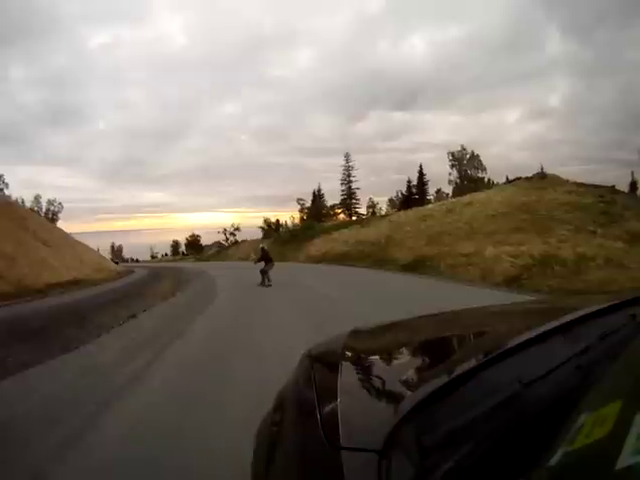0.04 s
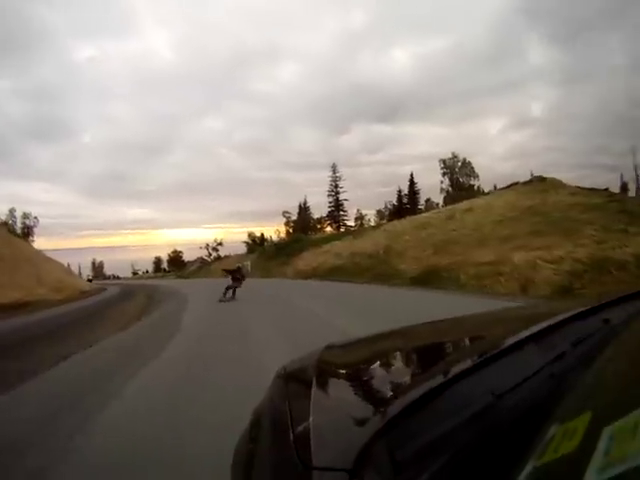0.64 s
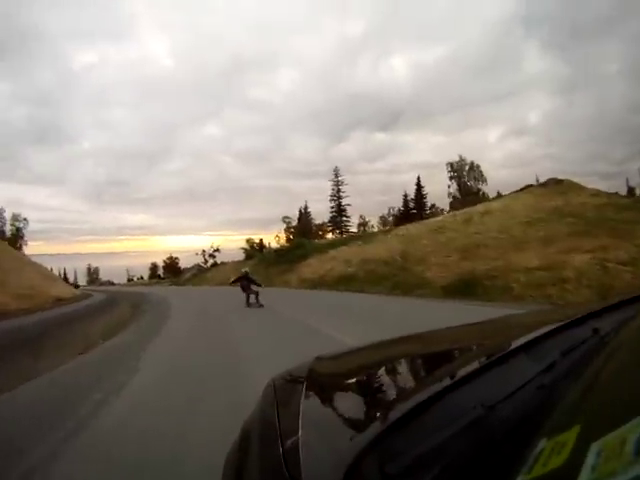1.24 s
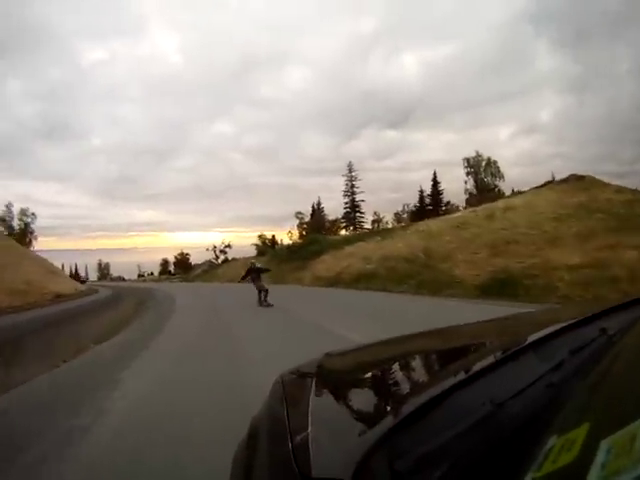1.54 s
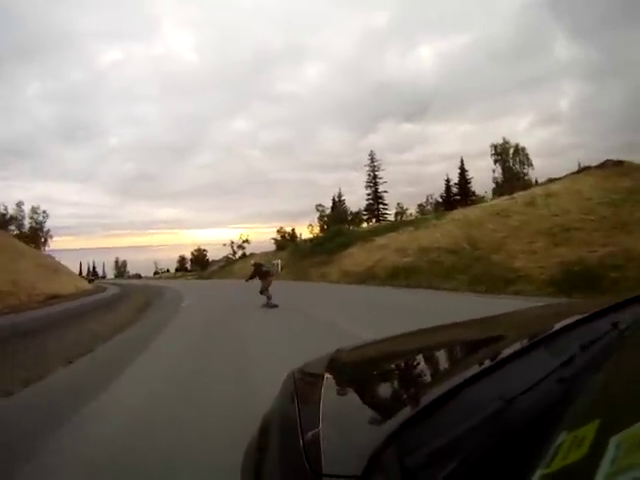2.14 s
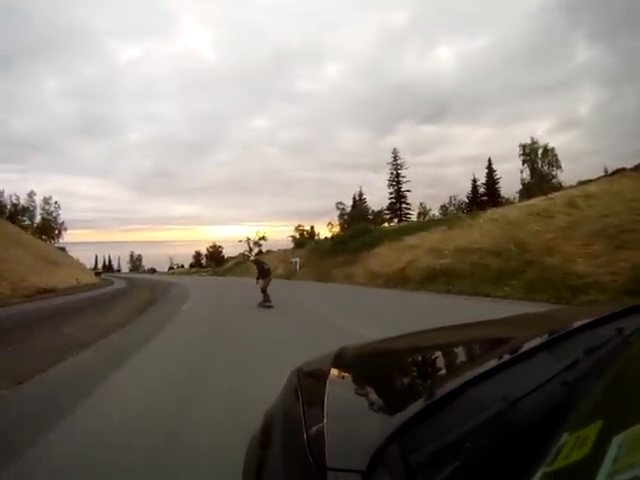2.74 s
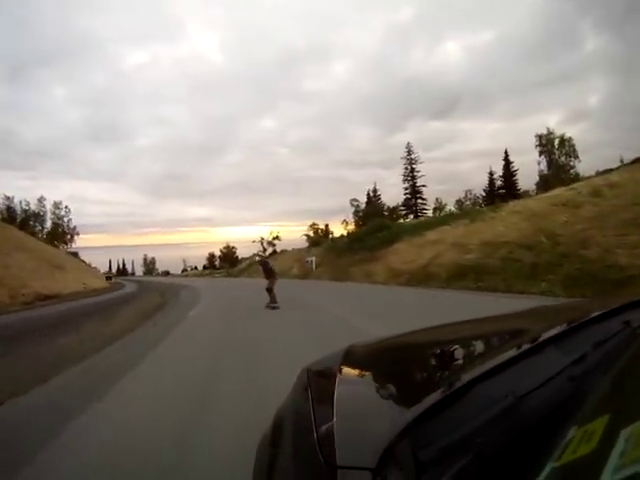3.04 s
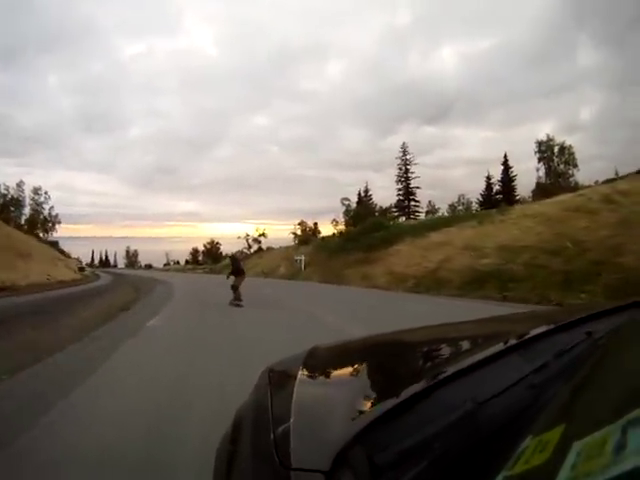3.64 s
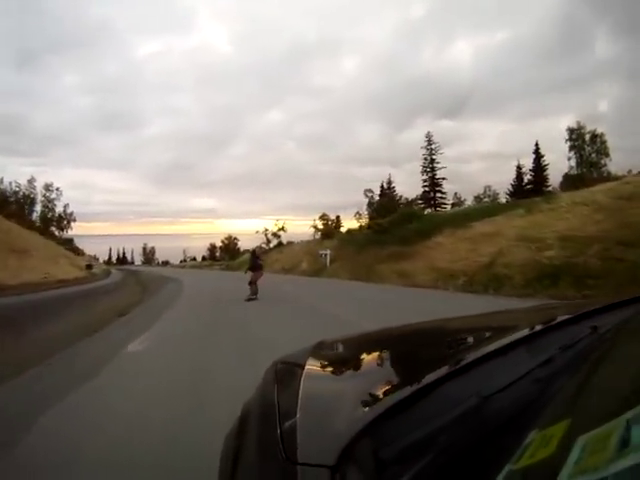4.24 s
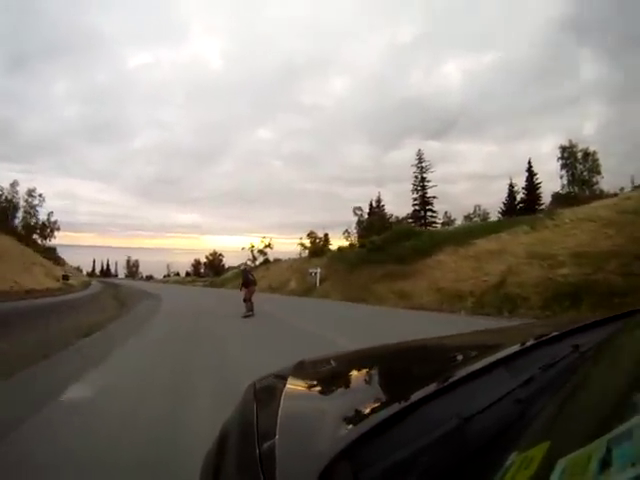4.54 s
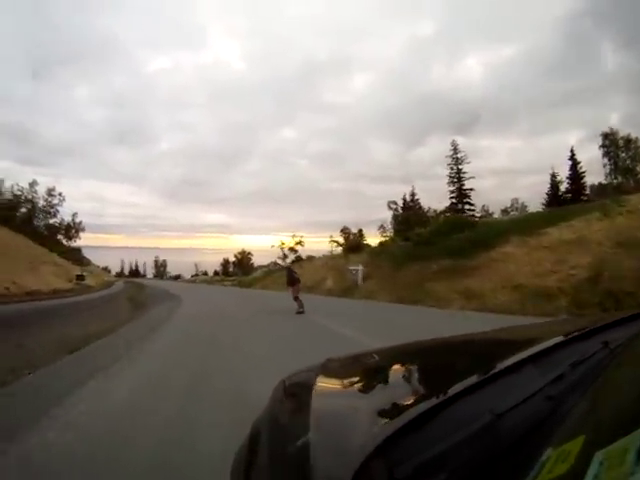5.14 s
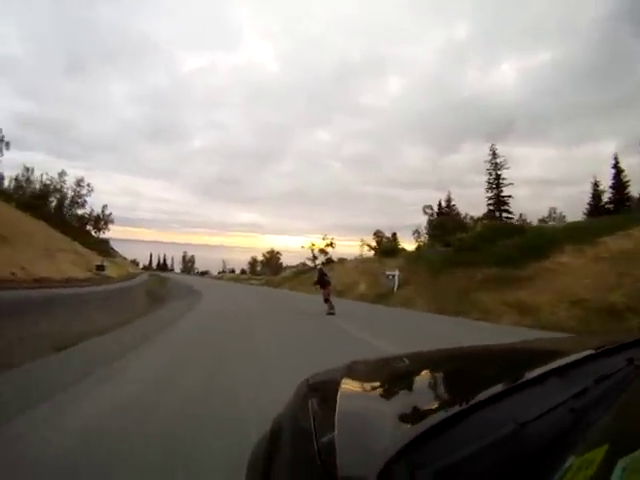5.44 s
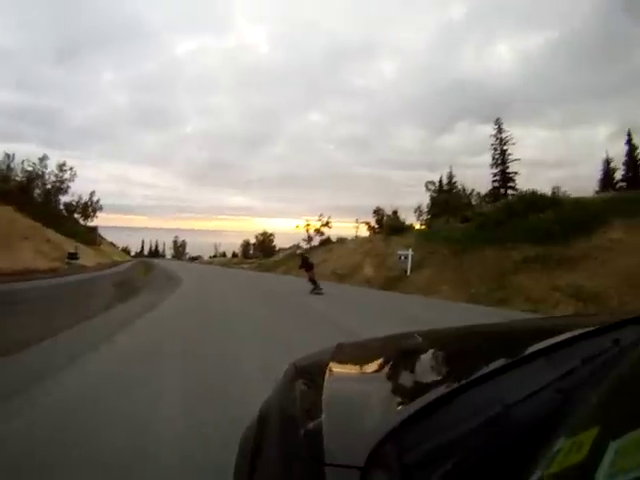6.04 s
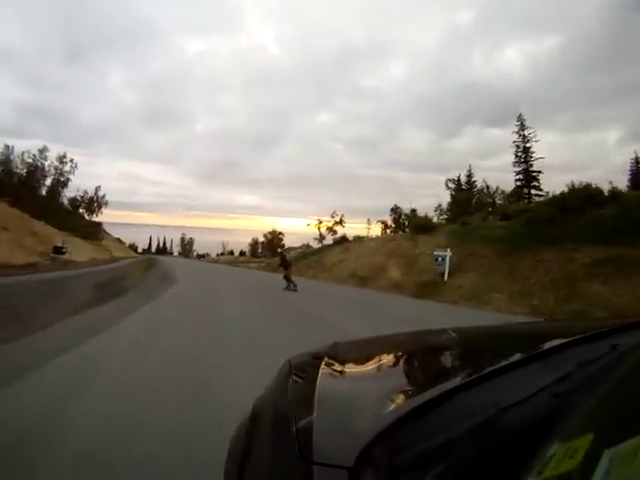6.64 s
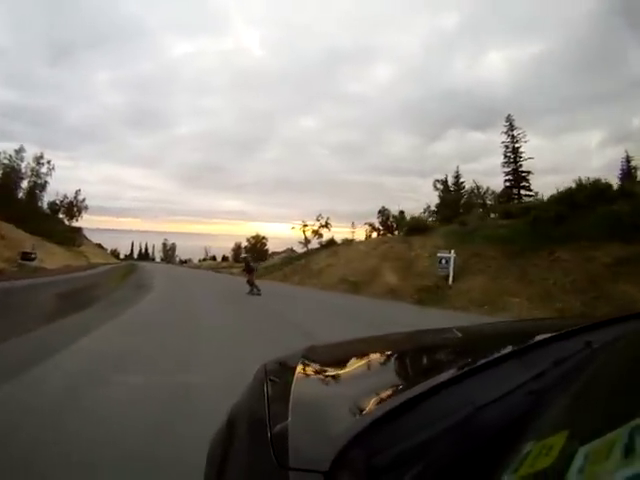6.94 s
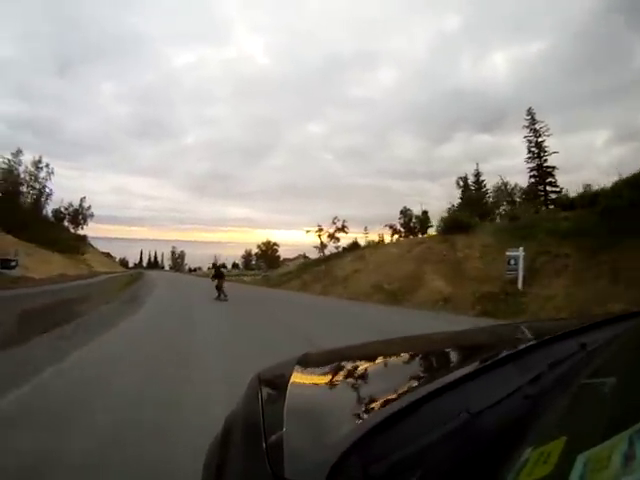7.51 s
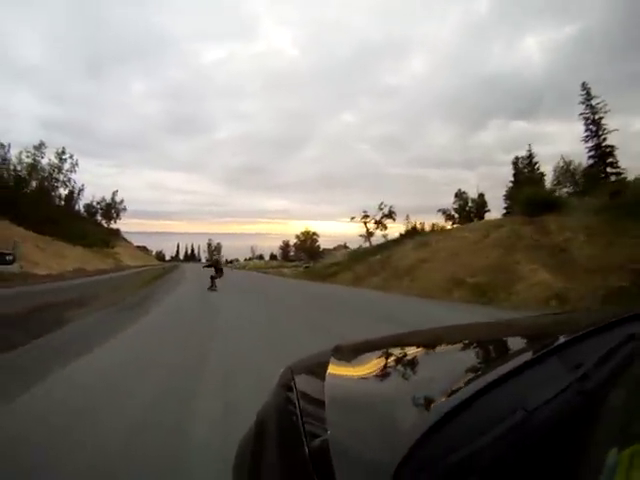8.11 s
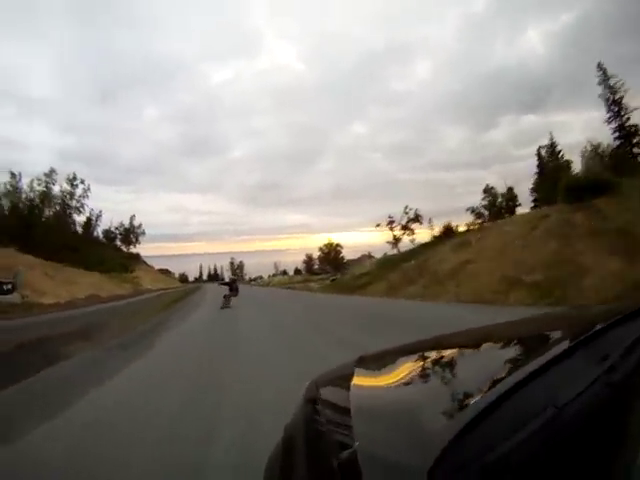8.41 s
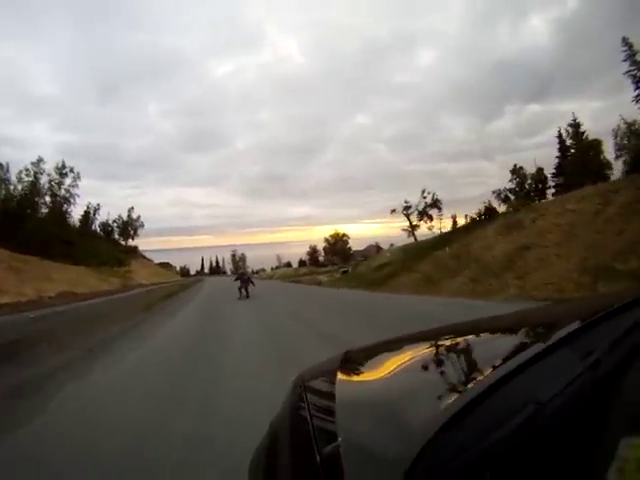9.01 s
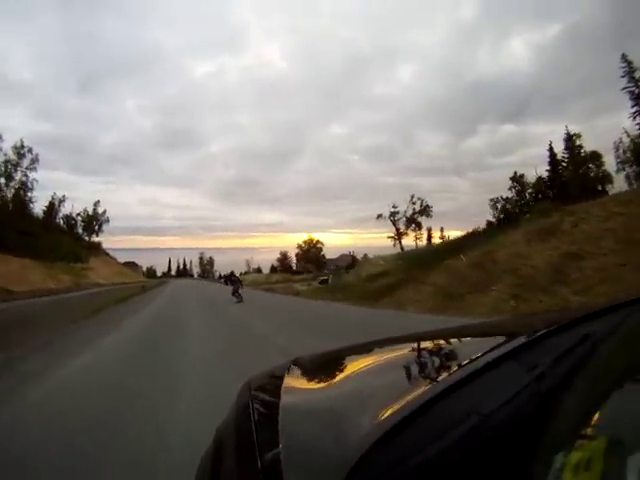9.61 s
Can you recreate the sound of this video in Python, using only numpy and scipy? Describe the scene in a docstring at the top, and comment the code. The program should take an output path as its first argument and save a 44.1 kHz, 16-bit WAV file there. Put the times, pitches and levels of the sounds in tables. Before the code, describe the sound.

A longboarder skids on an open road, the wheels scraping and groaning for about a second. The board then carves quietly beneath steady car rumble and wind while the camera mount ticks faintly. A sharp, very loud knock strikes the microphone's case just past halfway, and later a second, shorter skid scrapes and squeaks. Everything sounds gritty and nearly mono, heard from the car behind.

```python
"""An open road: a longboarder carves downhill and twice throws the wheels into a scraping slide.
Stick-slip makes the long slide judder and the short one squeal; flaws in the asphalt clack.
All is heard from a plastic camera case on the following car: tyres and wind rumble,
the mount ticks, something raps the case and rebounds.
A coarse sample-and-hold mirrors every sound into a gritty treble."""
import sys
import numpy as np
from scipy import signal
from scipy.fft import rfft, irfft, next_fast_len
from scipy.io import wavfile
from scipy.ndimage import map_coordinates

SR = 44100
rng = np.random.default_rng(int(sys.argv[2]) if len(sys.argv) > 2 else 0)


def digitize_waveform(pressure):
    """Quantize a signal to 16-bit integers and store it at the path in sys.argv[1].

    Rows of a 2-D input are taken as channels; values are limited to [-1, 1].
    """
    field = np.atleast_2d(pressure).T
    bounded = np.clip(field, -1, 1)
    quanta = np.round(bounded * 32767).astype(np.int16)
    wavfile.write(sys.argv[1], SR, quanta)


N = 430857
HOLD_HZ = 12000

# wheel drag: t/s, level/dB
LONG_DRAG = [(.55, -60.5), (.685, -55.5), (.71, -44), (.79, -40), (.84, -42), (.9, -36.5), (.975, -40),
             (1.028, -36.5), (1.072, -41.5), (1.13, -37.5), (1.32, -37.5), (1.44, -48.5), (1.55, -54.5),
             (1.6, -71)]
SHORT_DRAG = [(8.38, -62.5), (8.53, -59), (8.58, -50), (8.71, -45), (8.755, -50), (8.795, -42.5),
              (8.91, -43), (9.035, -56.5), (9.07, -79)]
# sliding wheel spectra: f/Hz, level/dB
LONG_TONE = [(170, -24), (310, -12.5), (560, -13), (860, -4), (1220, -5), (1400, -11), (1600, -6),
             (1830, -21), (2170, 0.5), (2380, -5), (2750, -10.5), (3600, -5.5), (4080, -25), (5600, -22.5)]
SHORT_TONE = [(170, -31), (310, -8), (500, -7.5), (850, -5), (1330, -8.5), (1610, -1.5), (1850, -12),
              (2150, -3), (2520, -1.5), (2850, -11), (3800, -7.5), (4550, -17.5), (4850, -14),
              (5800, -19.5)]
def slide(drag, tone, friction, roar_db, roar_slope, scrape_db, flutter_db):
    """Urethane dragged sideways: friction drives a low roar and a scrape that grows faster with drag."""
    push_db = curves(drag)[0] + 40  # roar_db and scrape_db hold at -40 dB drag
    wheels = coloured(friction, tone)
    lows = filtered(wheels, lambda hz: 1 / (1 + (hz / 1800) ** 12))
    roar = amp(roar_db + roar_slope * push_db) * unit(lows)
    scrape = amp(scrape_db + push_db) * unit(wheels - lows)
    return during(drag) * amp(flutter_db * wobble(45)) * (roar + scrape)


# stick-slip track: t/s, slip rate/Hz, level/dB re drag
JUDDER = [(.72, 270, -14), (.82, 278, -6), (.91, 310, -7.5), (1.05, 315, -13.5), (1.2, 304, -10),
          (1.27, 311, -5.5), (1.35, 280, -6.5), (1.45, 268, -10)]
# judder spectrum: f/Hz, level/dB
JUDDER_TONE = [(200, 0), (320, -10.5), (620, -1), (900, 7.5), (1250, 5), (1650, -11), (1900, -32),
               (2300, -8), (3500, -9), (5000, -21)]
def judder():
    """Slow stick-slip makes the long slide groan, following the drag."""
    rate_hz, share_db = curves(JUDDER)
    level = during(JUDDER) * amp(curves(LONG_DRAG)[0] + share_db)
    return level * stick_slip(rate_hz, JUDDER_TONE, jitter=.025, rough_db=1.5)


# squeals in the short slide: t/s, length/s, f/Hz, level/dB
SQUEALS = [(8.42, .22, 830, -57.5), (8.68, 0.051, 862, -45), (8.75, .16, 825, -56.5),
           (8.95, 0.071, 854, -48.5)]
# squeal spectrum: f/Hz, level/dB
SQUEAL_TONE = [(500, -12), (850, 2), (1650, -7), (2500, -21), (3400, -17), (5000, -19)]
def squeals(attack_s=.0124, release_s=.017, sag_hz_per_s=300):
    """Fast stick-slip breaks out in short squeals that sag in pitch."""
    level, rate_hz = np.zeros(N), np.full(N, float(SQUEALS[0][2]))
    for s, length_s, hz, db in SQUEALS:
        age_s = clock() - s
        level += amp(db) * held(s, s + length_s, attack_s, release_s)
        sagging_hz = hz - sag_hz_per_s * np.clip(age_s, 0, length_s)
        rate_hz = np.where(age_s > -attack_s, sagging_hz, rate_hz)
    return level * stick_slip(rate_hz, SQUEAL_TONE, jitter=.048, rough_db=5)


# scrubs in turns: t/s, half length/s, scrape/dB, moan/dB
SCRUBS = [(4.08, 0.22, -65.5, -65.5), (5.084, 0.12, -62.5, -64), (5.4, 0.14, -64, -83),
          (6.335, 0.081, -53, -68), (7.17, 0.047, -55, -75), (7.99, 0.044, -58, -66),
          (9.427, 0.067, -50.5, -68)]
# scrape and moan spectra: f/Hz, level/dB
SCRUB_TONE = [(300, -15), (850, -14.5), (1400, -10), (1600, -3), (1850, -11), (2120, 3.5), (2450, -1.5),
              (2900, -13), (3300, -8), (3900, -12), (4500, -22), (5800, -18)]
MOAN_TONE = [(250, -18), (430, -14), (560, 2.5), (680, -18), (860, 6.5), (1000, -6), (1500, -35)]
def carving():
    """The wheels scrub lightly and moan in the turns."""
    scrape, moan = np.zeros(N), np.zeros(N)
    for s, half_s, scrape_db, moan_db in SCRUBS:
        lean = swell(s, half_s)
        scrape += amp(scrape_db) * lean
        moan += amp(moan_db) * lean
    friction = grit(rate_hz=430, life_s=.0018, spread_db=2.5, smooth=.53)
    return scrape * coloured(friction, SCRUB_TONE) + moan * noise(MOAN_TONE)


# wheel knocks: t/s, level/dB, t60/s, f/Hz
CLACKS = [(.692, -39, 0.028, 2270), (0.701, -43, .02, 2250), (0.763, -33.5, .02, 2300),
          (1.918, -47.5, 0.026, 2300), (2.354, -51, 0.068, 1400), (4.09, -53, .08, 900),
          (6.601, -46.5, 0.027, 1050), (7.4426, -52, 0.092, 1620), (7.5278, -52, 0.04, 1700),
          (8.497, -48.5, 0.051, 3300), (8.852, -34, .05, 2910)]
def clacks(width_hz=900):
    """Each flaw in the asphalt knocks a wheel: a short burst around one pitch."""
    out, wheel = np.zeros(N), noise(SHORT_TONE)
    for s, db, t60_s, hz in CLACKS:
        ring = signal.lfilter(*signal.iirpeak(hz, hz / width_hz, SR), wheel)
        out += amp(db) * dying(s, t60_s) * unit(ring)
    return out


# blow and rebound: t/s, ring/dB, hardness/(dB/octave), crack/dB, rocking/dB
RAPS = [(5.558, 6, 1.5, -20.5, -32), (5.6675, -34, -5, -32, -43)]
# case modes: f/Hz, level/dB, t60/s
CASE_MODES = [(100, -37, 0.03), (198, -27, 0.037), (260, -32, 0.024), (783, -33, 0.0307), (950, -24, 0.032),
              (1120, -16.5, 0.019), (1800, -14, 0.012), (2110, -5, 0.0085), (2280, 0.5, 0.0092),
              (3590, -18, 0.011), (5460, -21, 0.006)]
# crack spectrum: f/Hz, level/dB
CRACK_TONE = [(200, -31), (700, 3), (1500, 15), (2300, -11), (3000, -16), (3800, 9), (5800, -26)]
def raps(attack_s=.0008):
    """Each contact cracks and rings the case; a soft one favours its low modes."""
    rings, cracks, t = np.zeros(N), np.zeros(N), np.arange(SR // 10) / SR
    main_hz = max(CASE_MODES, key=lambda mode: mode[1])[0]
    for s, ring_db, hardness, crack_db, _ in RAPS:
        ring = np.zeros(len(t))
        for hz, mode_db, t60_s in CASE_MODES:
            struck_db = mode_db + hardness * np.log2(hz / main_hz)
            ring += amp(struck_db - 60 * t / t60_s) * np.sin(2 * np.pi * hz * t)
        rings[round(s * SR):][:len(t)] += amp(ring_db) * ring * (1 - np.exp(-t / attack_s))
        cracks += amp(crack_db) * dying(s, t60_s=.021)
    return rings + cracks * noise(CRACK_TONE)


# scuff and buzz spectra: f/Hz, level/dB
SCUFF_TONE = [(100, 1), (330, -2.5), (520, -11), (950, 3.5), (1500, -4.5), (2250, 4), (3000, -13),
              (5800, -24)]
BUZZ_TONE = [(300, -27), (1100, -0.5), (1800, -3), (2300, 10.5), (2900, -10), (3600, -2), (4500, -10),
             (5800, -14)]
def shake():
    """The case is scuffed into the blow and buzzes until the rebound has passed."""
    blow_s, rebound_s = RAPS[0][0], RAPS[-1][0]
    scuff = amp(-21) * held(blow_s, blow_s, rise_s=.0065, fall_s=.0031)
    buzz = amp(-48.5) * held(blow_s - .026, rebound_s + .022, rise_s=.013, fall_s=.013)
    return scuff * noise(SCUFF_TONE) + buzz * noise(BUZZ_TONE)


# rocking spectrum: f/Hz, level/dB
ROCKING_TONE = [(12, -10), (26, 3.5), (48, -4), (70, -3.5), (130, -20), (400, -50), (1000, -62)]
def rocking(rise_s=.0065, t60_s=.28):
    """Each blow rocks the case on its mount until it comes to rest."""
    fall_s = t60_s / np.log(1000)
    return noise(ROCKING_TONE) * sum(amp(db) * held(s, s, rise_s, fall_s) for s, *_, db in RAPS)


# mount ticks: t/s, level/dB
TICKS = [(.197, -47), (0.4958, -38), (2.7921, -53), (3.2251, -53), (3.5863, -45), (5.4978, -48),
         (5.5054, -45), (5.5764, -39.5), (5.7564, -44.5), (6.521, -49.5), (7.0418, -50), (7.1181, -51),
         (7.3247, -52), (7.5637, -51), (7.965, -46), (9.2992, -46), (9.4244, -44.5)]
# click spectrum: f/Hz, level/dB
CLICK_TONE = [(600, -36), (1900, -7), (3200, -8), (4400, -9), (5000, -2), (5450, -16)]
def ticks(ring_hz=4910, ring_t60_s=.016, ring_gain_db=-5, click_gain_db=-3.5):
    """The plastic mount ticks: a click and a brief high ring."""
    rings, clicks, t = np.zeros(N), np.zeros(N), np.arange(SR // 20) / SR
    ring = amp(ring_gain_db - 60 * t / ring_t60_s) * np.sin(2 * np.pi * ring_hz * t)
    for s, db in TICKS:
        rings[round(s * SR):][:len(t)] += amp(db) * ring
        clicks += amp(db + click_gain_db) * dying(s, t60_s=.017)
    return rings + clicks * noise(CLICK_TONE)


# road noise, car slowing for the bend and picking up: t/s, level/dB
ROAD_LEVEL = [(0, -59), (1.2, -57.5), (2.9, -62), (5.3, -58.5), (6.8, -58.5), (7.8, -56.5), (9.77, -56.5)]
# car body and tyre spectra: f/Hz, level/dB
RUMBLE_TONE = [(15, -22), (30, -12), (50, -1), (75, -2), (130, -6), (220, -10.5), (400, -17.5),
               (800, -29.5), (2000, -67)]
TYRE_TONE = [(100, -13), (350, -7.5), (720, -5.5), (970, -4.5), (1110, 3.5), (1350, -6.5), (1620, -4.5),
             (1850, -9), (2150, -0.5), (2420, -1.5), (2900, -13.5), (3600, -7), (4200, -17.5), (5800, -20)]
def car(pace_db):
    """Body rumble and tyre rush follow the car's speed."""
    rumble = amp(-57 + 1.37 * pace_db + .9 * wobble(8)) * noise(RUMBLE_TONE)
    tyre_db = -58 + pace_db + .95 * wobble(11)
    friction = grit(rate_hz=810, life_s=.0019, spread_db=1, smooth=.63)
    return rumble + amp(tyre_db) * coloured(friction, TYRE_TONE)


# buffeting spectrum: f/Hz, level/dB
WIND_TONE = [(10, -16), (22, -5.5), (36, -0.5), (55, -9.5), (100, -18.5), (300, -38)]
def wind():
    """Gusts buffet the case, with a strong one early in the long slide."""
    gust_db = 2.4 * wobble(5.4) + 6.3 * swell(.77, half_s=.2)
    return amp(-59.5 + gust_db) * noise(WIND_TONE)


# rattle spectrum: f/Hz, level/dB
RATTLE_TONE = [(1500, -22), (3200, -7), (4400, -5), (4950, 4.5), (5450, -8)]
def rattle(pace_db):
    """The loose mount rattles in bouts, louder with speed."""
    contacts = grit(rate_hz=35, life_s=.002, spread_db=1.5, smooth=0)
    return amp(-77 + 1.1 * pace_db + 1.4 * wobble(2.93)) * coloured(contacts, RATTLE_TONE)


# hiss spectrum: f/Hz, level/dB
HISS_TONE = [(20, -13), (100, -12), (300, 4), (700, 4), (1200, -9.5), (2500, -2.5), (4200, 5.5),
             (5500, 1.5)]
def hiss():
    """A faint steady hiss."""
    return amp(-82.5) * noise(HISS_TONE)


def grit(rate_hz, life_s, spread_db, smooth):
    """Friction: each random catch gives a puff of noise, over a smooth share of the power."""
    catches = (rng.random(N) < rate_hz / SR) * amp(spread_db * rng.standard_normal(N)) ** 2
    power = signal.lfilter([1], [1, -np.exp(-1 / (life_s * SR))], catches)
    return rng.standard_normal(N) * np.sqrt(smooth + (1 - smooth) * power / power.mean())


def stick_slip(rate_hz, tone, jitter, rough_db):
    """Wheels grip and let go at an unsteady rate, one pulse a slip."""
    cycles = np.cumsum(rate_hz * (1 + jitter * wobble(220))) / SR
    slips = np.diff(np.floor(cycles), prepend=0) * amp(rough_db * wobble(150))
    return coloured(slips - slips.mean(), tone)


def amp(db):
    """dB to gain."""
    return 10 ** (np.asarray(db) / 20)


def unit(x):
    """Scale to rms 1."""
    return x / np.sqrt(np.mean(x ** 2) + 1e-20)


def clock():
    """Sample times in s."""
    return np.arange(N) / SR


def curves(rows):
    """One value per sample for each column after the time."""
    s, *columns = np.transpose(rows)
    return [np.interp(clock(), s, column) for column in columns]


def during(rows, fade_s=.02):
    """1 while a table lasts, fading outside it."""
    start_s, end_s = rows[0][0], rows[-1][0]
    return np.interp(clock(), [start_s - fade_s, start_s, end_s, end_s + fade_s], [0, 1, 1, 0])


def swell(s, half_s):
    """Gaussian envelope centred on s."""
    return np.exp(-.5 * ((clock() - s) / half_s) ** 2)


def held(start_s, end_s, rise_s, fall_s):
    """Envelope: exponential rise, hold from start to end, exponential fall."""
    t = clock()
    return np.exp(np.minimum(t - start_s, 0) / rise_s - np.maximum(t - end_s, 0) / fall_s)


def dying(s, t60_s):
    """Envelope: jumps to 1 at s and decays."""
    out = np.zeros(N)
    tail = out[round(s * SR):][:SR // 5]
    tail += amp(-60 * np.arange(len(tail)) / SR / t60_s)
    return out


def wobble(rate_hz):
    """Smooth random curve, rate_hz knots a second."""
    knots = rng.standard_normal(int(N * rate_hz / SR) + 4)
    return map_coordinates(knots, [clock() * rate_hz], order=3)


def filtered(x, response):
    """Apply a gain given as a function of Hz."""
    size = next_fast_len(N + 8192)
    return irfft(rfft(x, size) * response(np.fft.rfftfreq(size, 1 / SR)), size)[:N]


def coloured(x, tone):
    """Shape x by a spectrum, cut at half the hold rate, scale to rms 1."""
    knots_hz, db = np.transpose(tone)
    def response(hz):
        return amp(np.interp(np.log(hz + 1), np.log(knots_hz), db)) * (hz < HOLD_HZ / 2)
    return unit(filtered(x, response))


def noise(tone):
    """Coloured noise, rms 1."""
    return coloured(rng.standard_normal(N), tone)


def scene():
    """Near mono inside the case; only hiss and the case's sway differ between the sides."""
    long_slide = slide(LONG_DRAG, LONG_TONE, grit(rate_hz=370, life_s=.00061, spread_db=0, smooth=.57),
                       roar_db=-47, roar_slope=.67, scrape_db=-39, flutter_db=.57)
    short_slide = slide(SHORT_DRAG, SHORT_TONE,
                        grit(rate_hz=450, life_s=.00077, spread_db=0, smooth=.52),
                        roar_db=-42.5, roar_slope=.93, scrape_db=-39.5, flutter_db=.4)
    board = long_slide + short_slide + judder() + squeals() + carving() + clacks()
    pace_db = curves(ROAD_LEVEL)[0] + 58  # re -58 dB; rises with speed
    case = ticks() + rattle(pace_db) + raps() + shake()
    mid = board + case + wind() + car(pace_db) + rocking()
    side = hiss() + amp(-29) * rocking()
    return np.array([mid + side, mid - side])


def record(dry, ceiling=.93, band_hz=5700, top_hz=15300):
    """Soft overload, then sample-and-hold: the steps mirror the sound around the hold rate."""
    clipped = dry / (1 + (dry / ceiling) ** 8) ** (1 / 8)
    narrow = [filtered(channel, lambda hz: 1 / np.sqrt(1 + (hz / band_hz) ** 50)) for channel in clipped]
    coarse = signal.resample_poly(narrow, HOLD_HZ, SR, axis=1, window=("kaiser", 4))
    steps = np.repeat(coarse, 4, axis=1)
    fine = signal.resample_poly(steps, SR, 4 * HOLD_HZ, axis=1)[:, :N]
    return np.array([filtered(channel, lambda hz: hz < top_hz) for channel in fine])


dry = scene()
out = record(dry)
digitize_waveform(out)
```